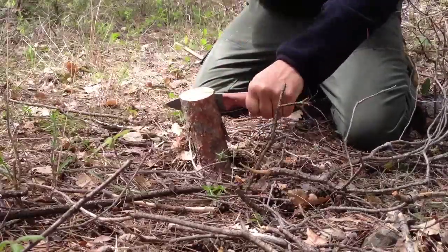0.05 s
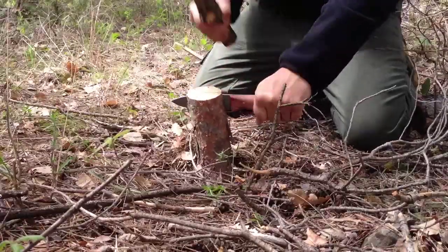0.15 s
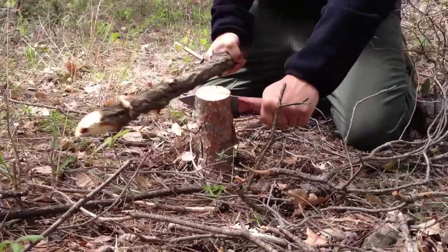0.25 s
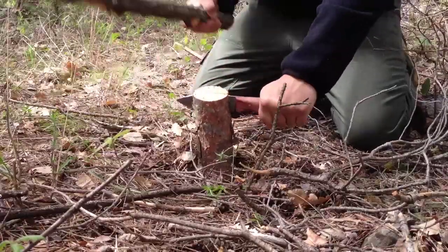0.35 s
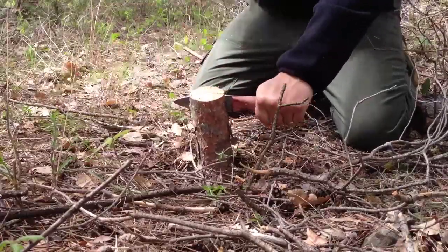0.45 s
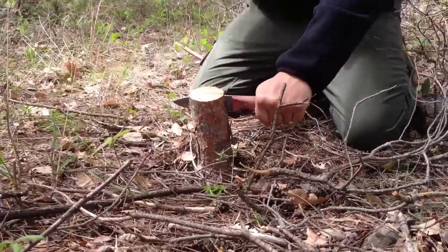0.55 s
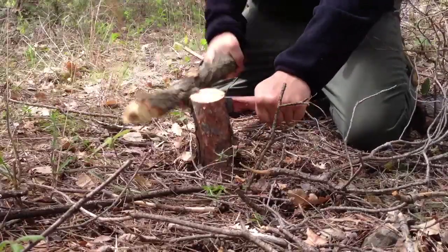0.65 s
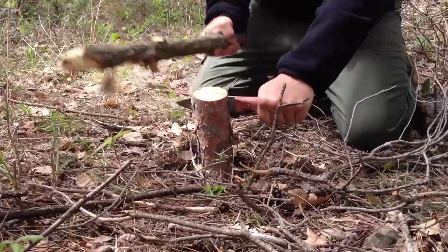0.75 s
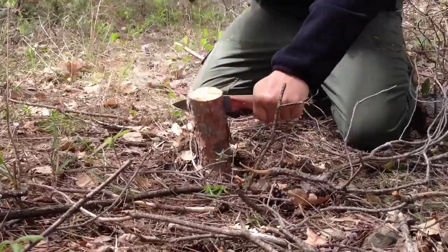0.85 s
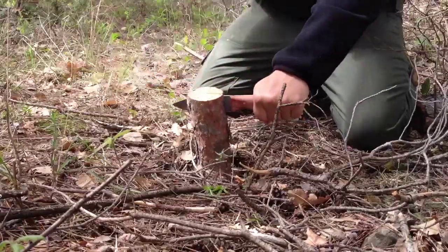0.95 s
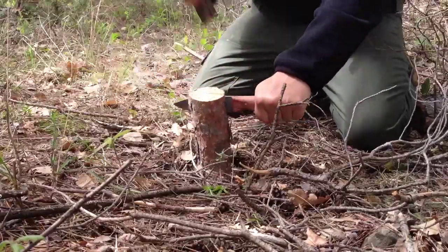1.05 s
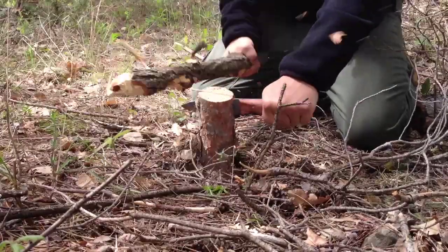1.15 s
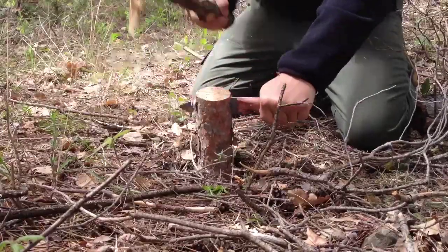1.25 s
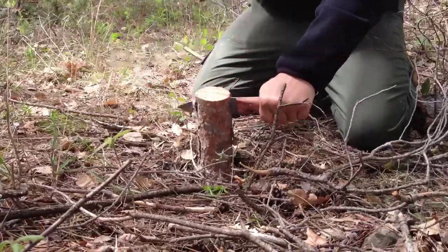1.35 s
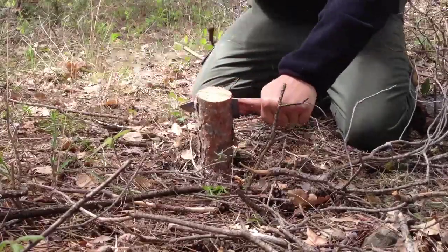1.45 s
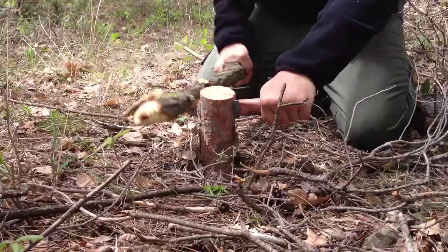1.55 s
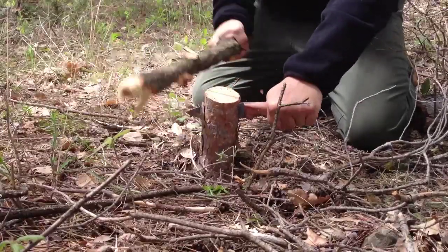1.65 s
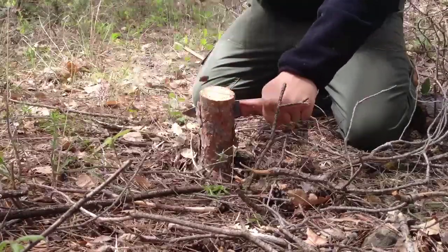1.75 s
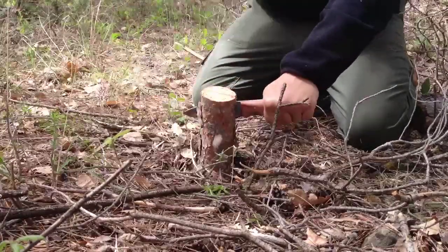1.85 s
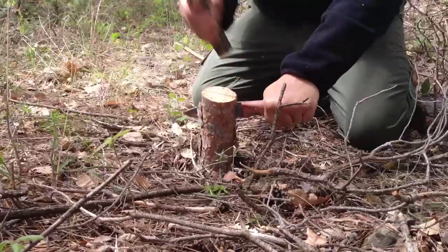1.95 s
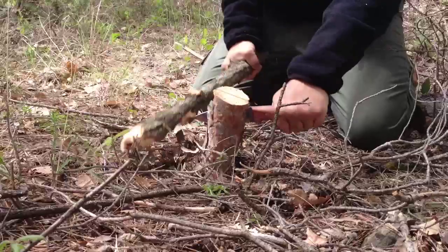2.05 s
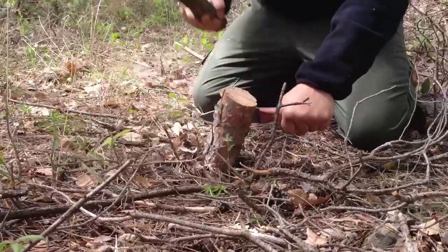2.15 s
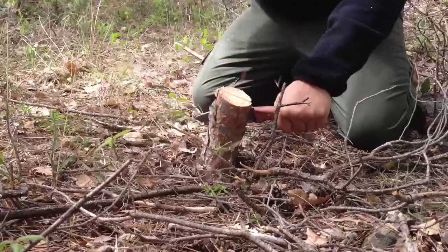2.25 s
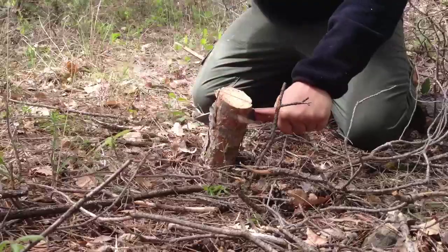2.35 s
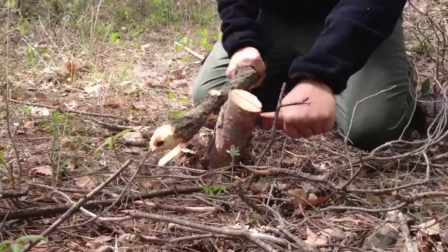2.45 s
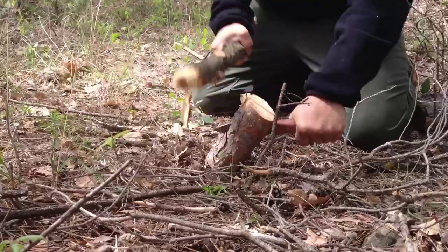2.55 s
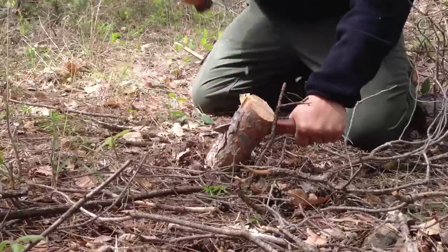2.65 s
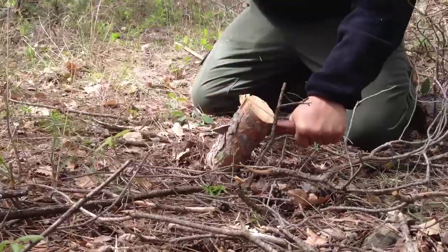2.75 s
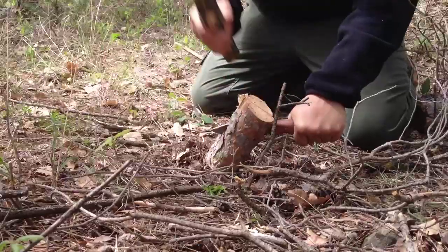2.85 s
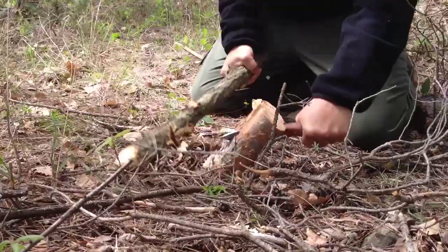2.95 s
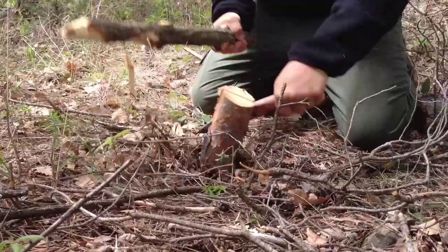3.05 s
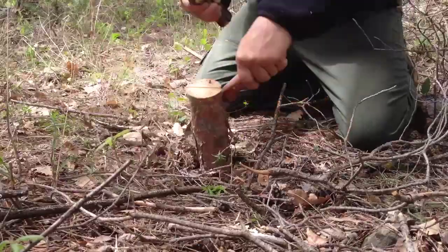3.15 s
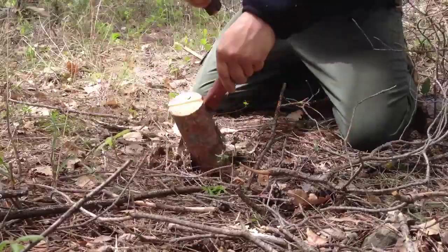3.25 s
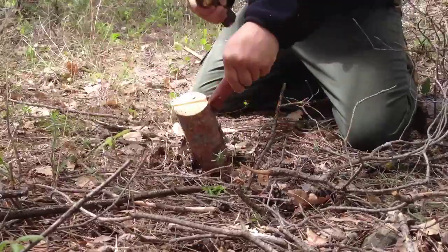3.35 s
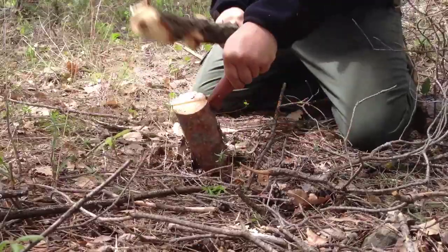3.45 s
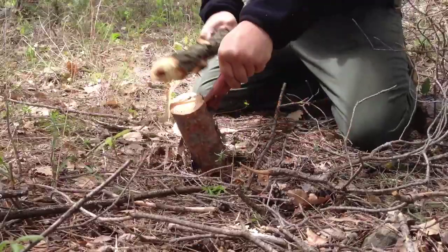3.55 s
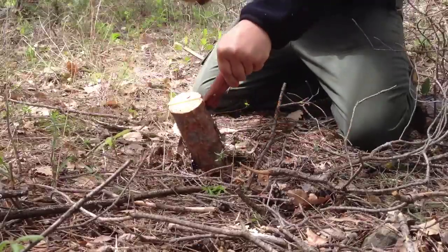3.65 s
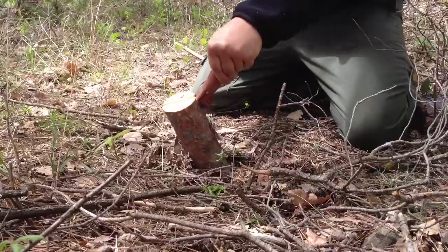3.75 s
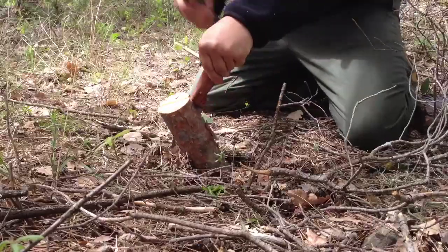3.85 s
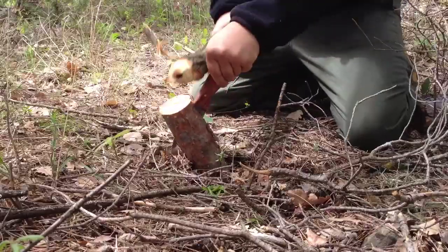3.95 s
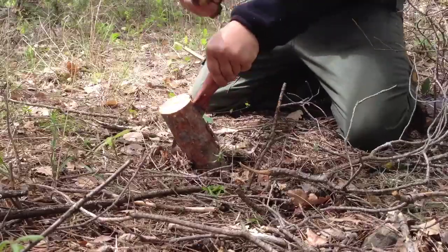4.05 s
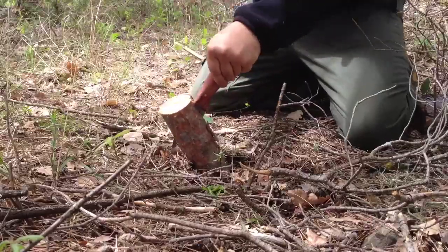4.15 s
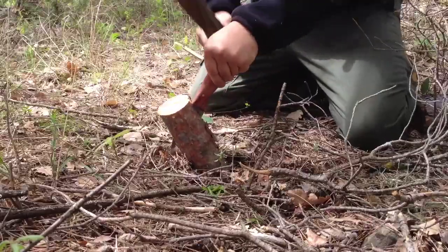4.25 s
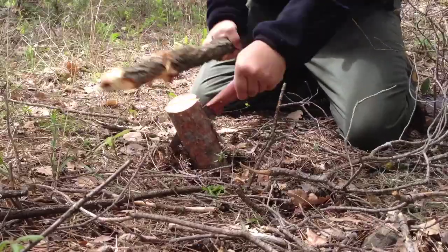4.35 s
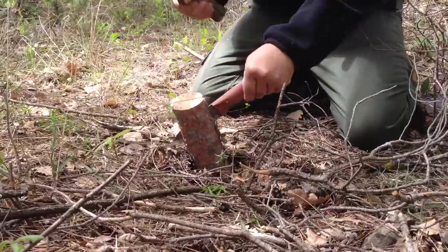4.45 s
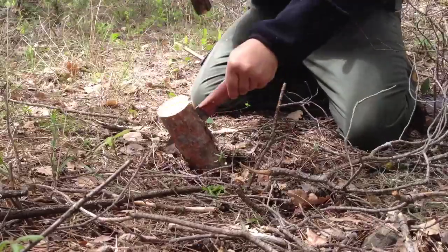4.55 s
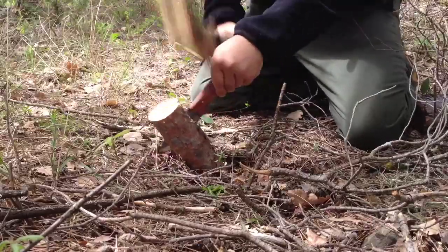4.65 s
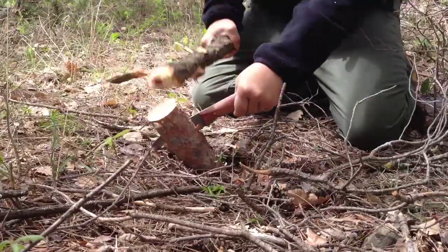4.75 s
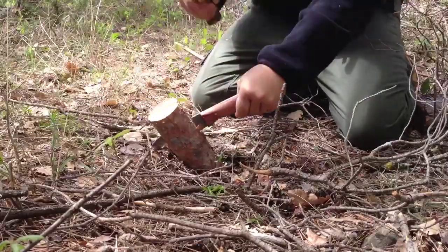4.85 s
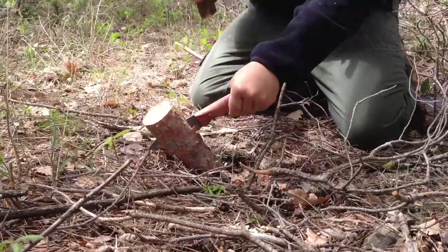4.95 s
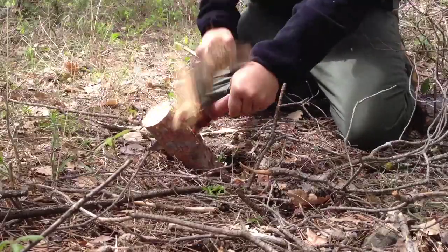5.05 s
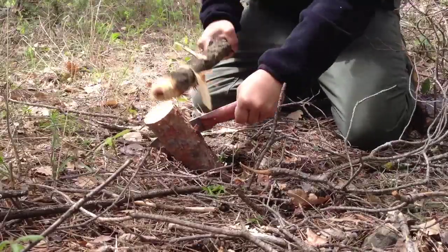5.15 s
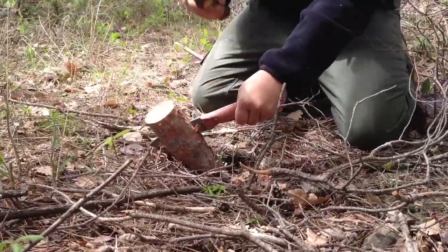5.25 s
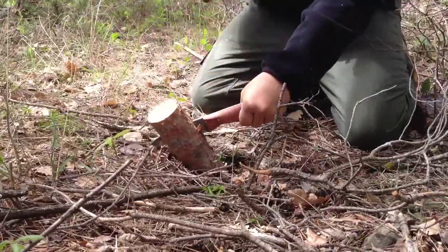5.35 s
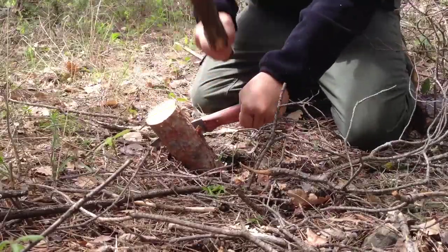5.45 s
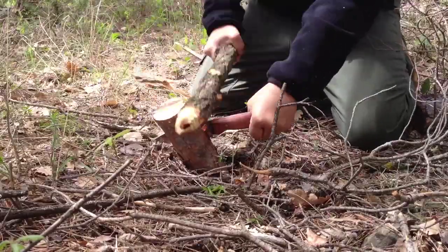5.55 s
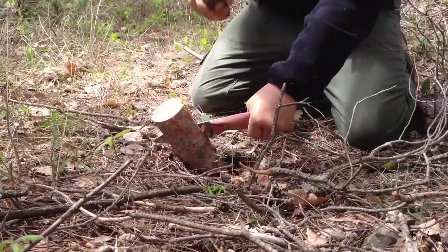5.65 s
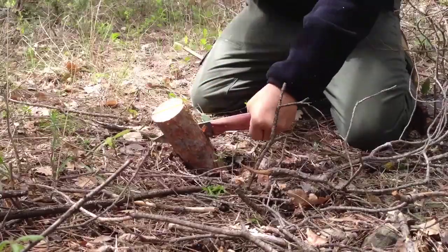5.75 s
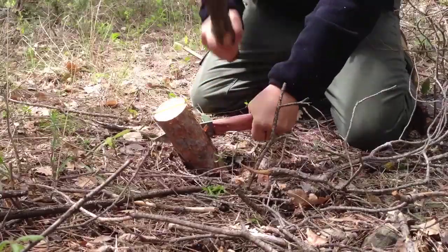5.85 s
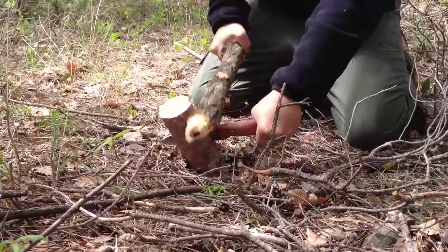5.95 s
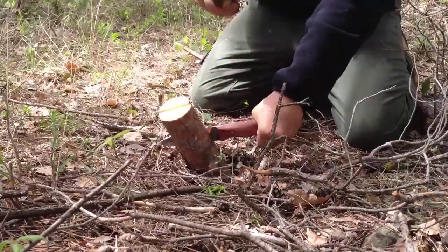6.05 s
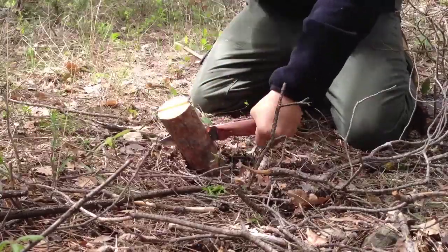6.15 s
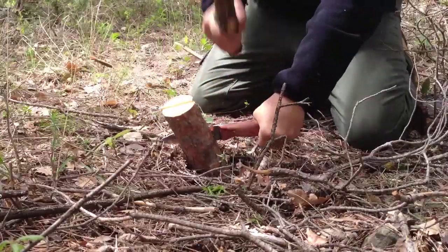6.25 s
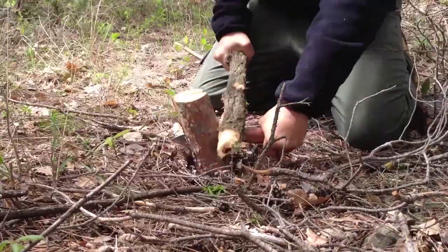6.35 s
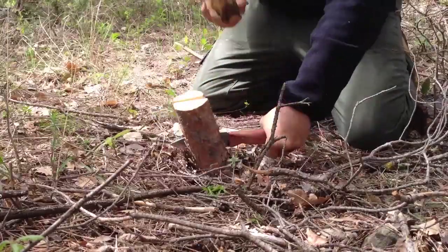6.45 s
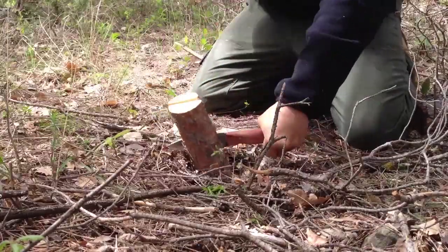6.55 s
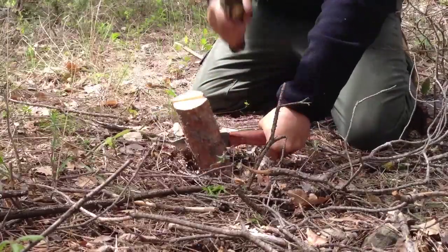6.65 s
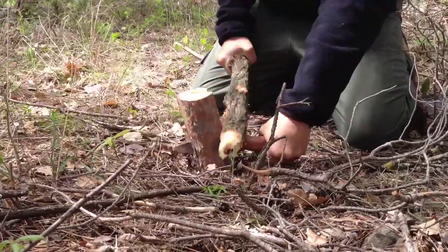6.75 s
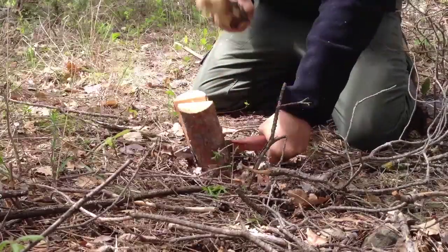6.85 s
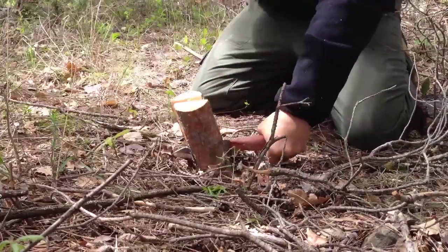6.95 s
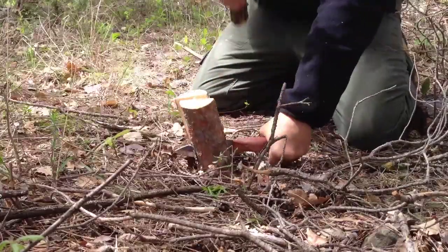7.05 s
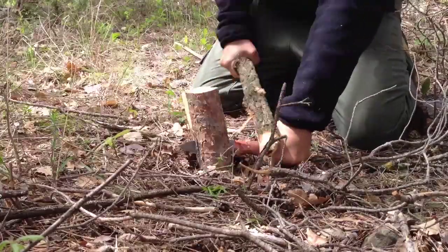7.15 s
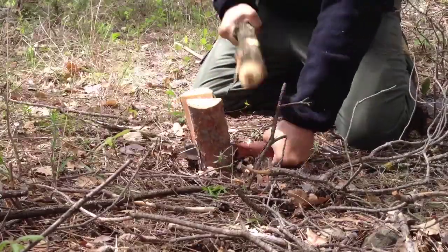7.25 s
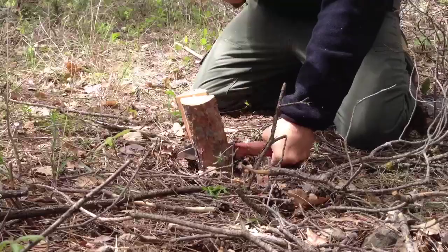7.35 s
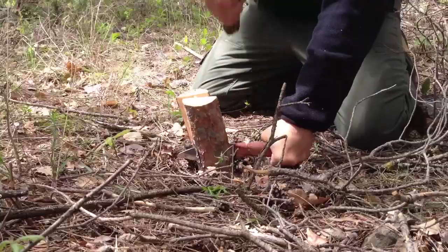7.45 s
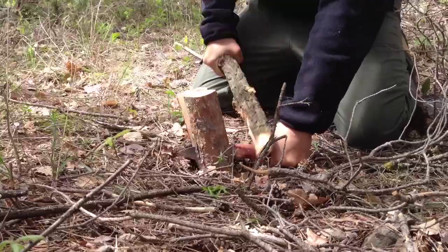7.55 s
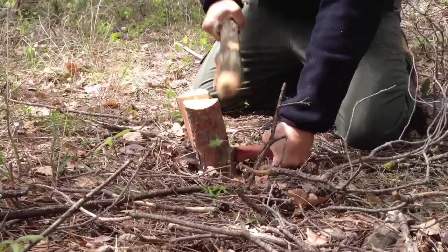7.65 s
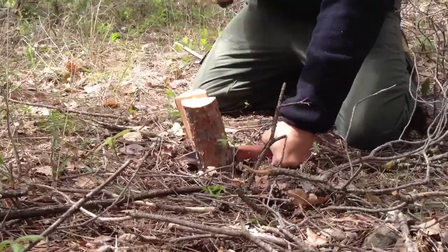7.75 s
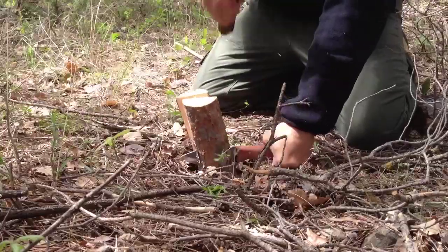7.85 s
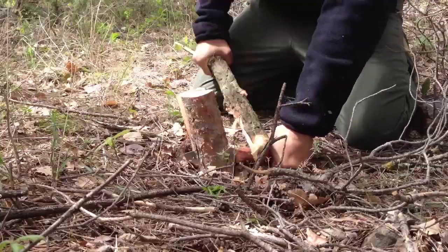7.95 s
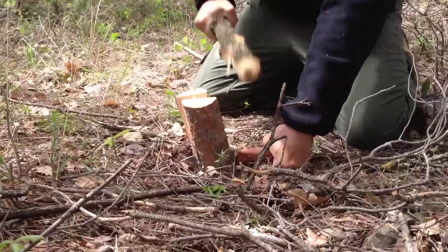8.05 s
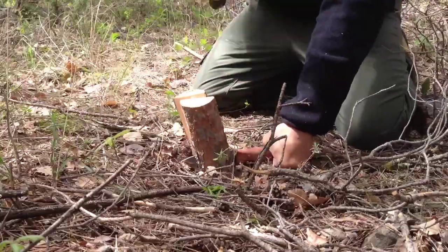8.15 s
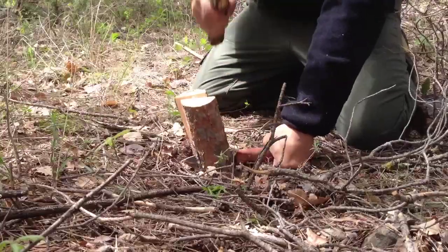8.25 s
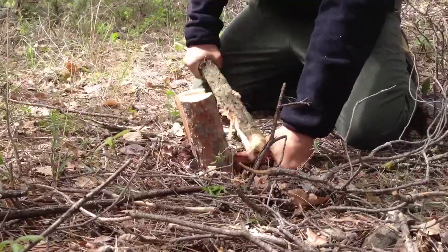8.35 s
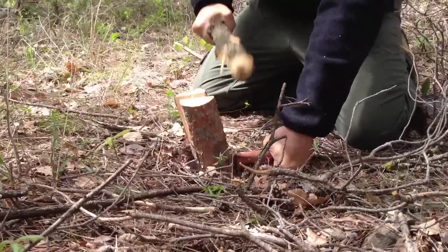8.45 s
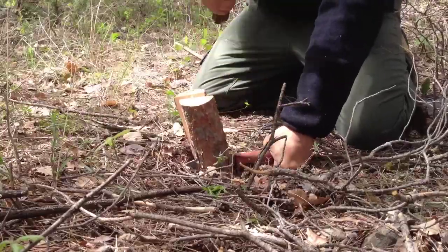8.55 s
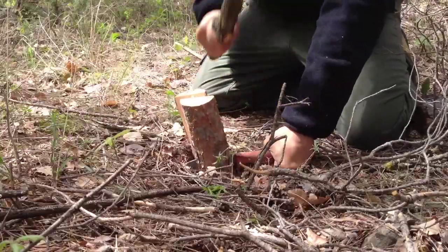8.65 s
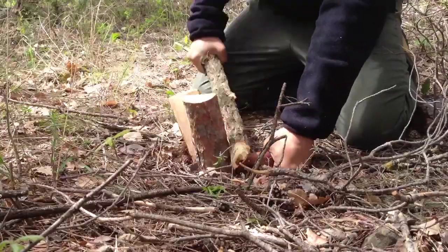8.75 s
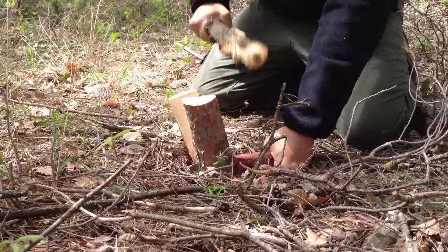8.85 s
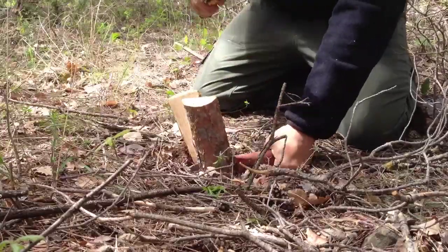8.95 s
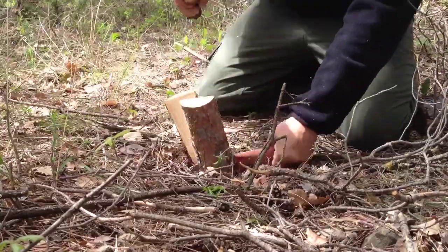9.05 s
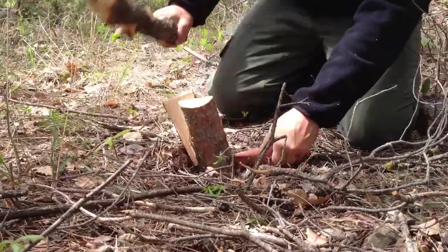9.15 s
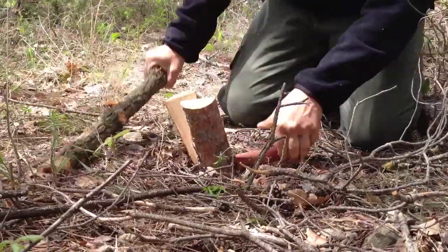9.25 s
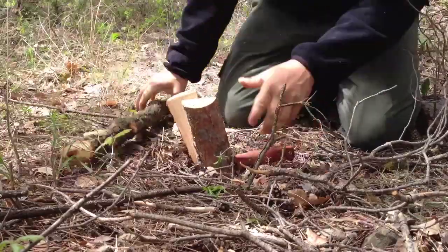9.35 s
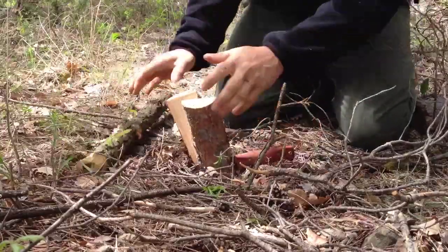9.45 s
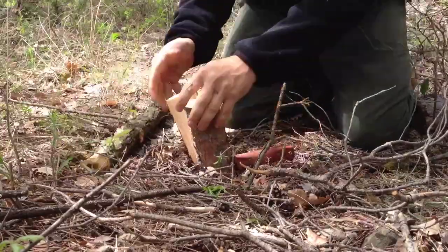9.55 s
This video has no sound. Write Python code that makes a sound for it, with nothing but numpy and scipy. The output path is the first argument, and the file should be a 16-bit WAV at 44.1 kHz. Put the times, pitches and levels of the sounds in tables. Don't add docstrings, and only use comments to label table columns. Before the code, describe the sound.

Sharp wood-on-steel knocks about every four tenths of a second drive a blade through a log, each scattering dry litter outdoors.

```python
import sys
import numpy as np
from scipy import signal
from scipy.io import wavfile

SR = 44100
rng = np.random.default_rng(int(sys.argv[2]) if len(sys.argv) > 2 else 0)


def convert_level_to_amplitude(level_db):
    exponent = np.asarray(level_db, float) / 20
    return 10 ** exponent


def digitize_waveform(pressure):
    field = np.atleast_2d(pressure).T
    bounded = np.clip(field, -1, 1)
    quanta = np.round(bounded * 32767).astype(np.int16)
    wavfile.write(sys.argv[1], SR, quanta)


N = 423351

# (time [s], crack [dB], upper blade tone [Hz], blade song [dB], ground thud [dB])
STICK_BLOWS = [(0.2628, -23, 6100, -15, -29), (0.7138, -14, 7160, -3, -14), (1.1663, 4.5, 5530, -3.5, -20),
               (1.606, -2.5, 5630, -11, -22), (2.0505, -2.5, 6870, -6, -21), (2.4971, -1, 5160, -1, -25),
               (2.9494, -3.5, 5300, -17, -28), (3.547, -19.5, 6540, -25, -48),
               (3.9501, -2.5, 6000, -3.5, -25.5), (4.331, -5, 6770, -11.5, -32),
               (4.719, -8, 6500, -11.5, -34.5), (5.119, -0.5, 5780, -8.5, -31),
               (5.5375, -3.5, 6100, -8.5, -29), (5.9389, -2.5, 6850, -15.5, -29),
               (6.3428, -0.5, 5870, -20, -35.5), (6.7567, -4, 6860, -9, -30.5),
               (7.1774, -0.5, 6990, -15.5, -34.5), (7.577, -1, 7100, -17, -32.5),
               (7.9734, -2.5, 6800, -16.5, -31), (8.366, -3, 7120, -20.5, -31.5),
               (8.7514, 0.5, 6040, -32, -33.5), (9.3056, -32.5, 5770, -46, -52)]
# (log knock [dB], log pitch [Hz], stick tone [dB], stick pitch [Hz], litter spray [dB])
BLOW_RESPONSES = [(-29.5, 360, -33, 1450, -22), (-20.5, 350, -27, 1500, -12.5),
                  (-19.5, 422, -23, 1540, -10.5), (-23.5, 417, -27, 1170, -13.5),
                  (-24.5, 413, -30, 1190, -9), (-25.5, 473, -25.5, 1624, -14.5),
                  (-20, 392, -49, 1600, -16.5), (-32, 348, -45, 1930, -21.5), (-15, 370, -23, 972, -6),
                  (-19.5, 355, -21.5, 1290, -7), (-17, 346, -20.5, 1420, -7), (-22, 442, -24, 1380, -9),
                  (-23, 410, -30.5, 1630, -10.5), (-22, 535, -27, 1700, -13),
                  (-21.5, 584, -22.5, 1080, -11), (-22, 540, -23.5, 1090, -12), (-24, 506, -21, 1090, -12),
                  (-30, 430, -23, 1310, -15.5), (-29, 480, -27, 1490, -10.5), (-31, 510, -29, 1260, -13),
                  (-26.5, 500, -32, 1340, -13), (-53, 450, -60, 1640, -22.5)]


def rms_one(x):
    return x / np.sqrt(np.mean(x ** 2) + 1e-20)


def band(x, low_hz, high_hz):
    return signal.sosfilt(signal.butter(2, [low_hz, high_hz], "band", fs=SR, output="sos"), x)


def high_pass(x, hz):
    return signal.sosfilt(signal.butter(2, hz, "high", fs=SR, output="sos"), x)


def resonance(x, hz, width_hz):
    r = np.exp(-np.pi * width_hz / SR)
    feedback = [1, -2 * r * np.cos(2 * np.pi * hz / SR), r * r]
    return signal.lfilter([(1 - r * r) / 2, 0, (r * r - 1) / 2], feedback, x)


def ring(hz, t60_s, rise_s, size=4000):
    t = np.arange(size) / SR
    return np.sin(2 * np.pi * hz * t) * convert_level_to_amplitude(-60 * t / t60_s) * (1 - np.exp(-t / rise_s))


def add(out, sound, time_s):
    i = max(round(time_s * SR), 0)
    out[i:i + len(sound)] += sound[:N - i]


def drift(rate_hz):
    r = np.exp(-80 * np.pi * rate_hz / SR)
    white = rng.standard_normal(N // 40 + 2002)
    slow = signal.lfilter([1], [1, -2 * r, r * r], white)[2000:]
    return np.interp(np.arange(N) / 40, np.arange(len(slow)), rms_one(slow))


def coloured(white, spectrum, patchy_db):
    edges = 40 * 2 ** (np.arange(27) / 3)
    centres = np.sqrt(edges[1:] * edges[:-1])
    hz, db = np.transpose(spectrum)
    gains = convert_level_to_amplitude(np.interp(np.log(centres), np.log(hz), db))
    bands = []
    for k, gain in enumerate(gains):
        flicker = convert_level_to_amplitude(patchy_db * drift(1.65))
        bands.append(gain * flicker * band(white[k % 2], edges[k], edges[k + 1]))
    return centres, np.array(bands)


def cracks():
    # (frequency [Hz], width [Hz], level [dB])
    crack_modes = [(2980, 600, -24), (3630, 800, -3), (4740, 750, -16.5), (5960, 1190, 2),
                   (6850, 820, -29.5), (10400, 1100, -14), (12900, 2000, -16.5)]
    # (time [s], peak [dB], ring [Hz], fall
    # [ms])
    rebounds = [(0.2726, -15.5, 6260, 0.65), (0.715, -1.5, 3000, 1.52), (0.7177, -1, 4650, 1.4),
                (1.1648, -10.5, 6500, 0.57), (1.176, -20, 6650, 1.3), (1.1805, -34, 6000, 0.7),
                (1.609, -7.5, 5140, 0.82), (2.0597, -5.5, 4960, 1.2), (2.5022, -18.5, 5150, 1.8),
                (2.954, -10, 5100, 1.2), (2.9586, -17.5, 6600, 1.4), (3.956, -12.5, 4400, 1.4),
                (3.963, -10.5, 4900, 0.92), (4.3434, -3, 5100, 1.05), (4.7285, -22, 1720, 8.1),
                (4.7381, -10.5, 5710, 0.84), (5.1331, -13.5, 5500, 1.7), (5.5467, -15, 5960, 0.98),
                (5.5526, -10.5, 6050, 0.39), (5.9434, -21, 6780, 0.84), (6.3468, -10, 5970, 0.9),
                (6.761, -11, 6000, 0.79), (6.772, -28, 4800, 0.8), (7.1825, -11, 6750, 0.74),
                (7.193, -36, 4500, 0.87), (7.5812, -9, 5100, 1.4), (7.9838, -18.5, 7000, 0.92),
                (8.3699, -18, 6600, 1.1), (8.3768, -30, 5300, 1.3), (8.755, -12, 4300, 1.26)]
    # (time [s], peak [dB], ring [Hz], fall [ms])
    snaps = [(1.0504, -30.5, 1610, 2.4), (1.2561, -13.5, 5400, 0.7), (1.4165, -42, 3200, 1.1),
             (1.676, -25, 4660, 0.85), (2.1463, -33, 6270, 1.7), (2.1605, -29, 5900, 1.5),
             (2.1862, -32, 6560, 0.88), (2.274, -25.5, 1740, 0.81), (3.8972, -37, 1680, 0.75),
             (7.338, -25, 2330, 1), (7.3706, -39, 6030, 0.7), (7.6415, -41, 2410, 2.6),
             (7.6832, -27, 5800, 2.7), (8.4644, -34.5, 7500, 2.6), (9.312, -32, 5870, 3.7),
             (9.3523, -37, 6440, 1.2), (9.429, -39.5, 6000, 29), (2.1375, -41, 5800, 0.8),
             (2.168, -34, 5600, 0.9), (2.173, -36, 6600, 0.9)]
    touches = []
    for (s, peak_db, hz, *_), (knock_db, *_) in zip(STICK_BLOWS, BLOW_RESPONSES):
        woody_db = knock_db + 8 - peak_db
        if 3.3 < s < 5.3:
            woody_db += 3.5
        touches.append((s, peak_db, hz, 0.7, woody_db))
    touches += [(*row, -9.5) for row in rebounds]
    touches += [(*row, -16) for row in snaps]

    out = np.zeros(N)
    ms = np.arange(3000) / SR * 1000
    for s, peak_db, hz, fall_ms, woody_db in touches:
        rise_ms = min(0.5 * fall_ms, 2.2)
        shape = (1 - np.exp(-ms / rise_ms)) ** 2 * np.exp(-ms / fall_ms)
        chatter = convert_level_to_amplitude(-11) * np.exp(-ms / 7)
        force = rng.standard_normal(3000) * (shape / shape.max() + chatter)
        force[shape.argmax()] -= 2.5
        modes = [*crack_modes, (hz, 550, -1.5)]
        bright = sum(convert_level_to_amplitude(db) * rms_one(resonance(force, f, width)) for f, width, db in modes)
        woody = rms_one(resonance(force, 1044, 810)) - rms_one(resonance(force, 2200, 550))
        sound = bright / np.abs(bright).max() + convert_level_to_amplitude(woody_db + 1.0) * woody / np.abs(woody).max()
        add(out, convert_level_to_amplitude(peak_db - 2.0) * sound, s + 0.0002)
    return high_pass(out, 800)


def wood_and_blade():
    # (log overtone over knock [dB], blade-side tone [Hz], upper over lower blade tone [dB])
    spots = [(2.5, 2330, -14), (0.5, 2200, -10), (5, 3070, -10.5), (5.5, 3350, -13), (6, 3000, -5.5),
             (8, 3820, -10), (1, 2800, 3), (2.5, 2100, -2), (1, 2020, -7), (0.5, 2830, -5), (1, 2680, -2),
             (2.5, 3170, -10), (1, 3140, 3), (-8, 2270, 5.5), (-15, 2890, 0), (-8, 3090, -4.5),
             (-6, 2310, 0.5), (5.5, 2890, 8), (1.5, 2700, 4.5), (-11, 2840, 9.5), (-33, 3060, -4),
             (2, 2200, -6)]
    out = np.zeros(N)
    for blow, response, spot in zip(STICK_BLOWS, BLOW_RESPONSES, spots):
        s, _, high_hz, song_db, thud_db = blow
        knock_db, log_hz, stick_db, stick_hz, _ = response
        overtone_db, side_hz, high_db = spot

        knock = ring(log_hz, 0.017, 0.00057)
        overtone = convert_level_to_amplitude(overtone_db - 7) * ring(1.854 * log_hz, 0.018, 0.00022)
        log = convert_level_to_amplitude(knock_db + 11.0) * (knock - overtone)
        side = convert_level_to_amplitude(4) * ring(side_hz, 0.0084, 0.00017)
        stick = convert_level_to_amplitude(stick_db + 8.5) * (ring(stick_hz, 0.02, 0.00069) - side)
        body = convert_level_to_amplitude(thud_db + 7.5) * ring(245, 0.041, 0.0049)
        add(out, body - (log + stick), s + 0.00044)

        low_hz = 4776 if s < 5.75 else 4630
        sing_t60_s = 0.0053
        high = convert_level_to_amplitude(high_db + 12.5) * ring(high_hz, sing_t60_s, 0.00033)
        add(out, convert_level_to_amplitude(song_db) * (ring(low_hz, sing_t60_s, 0.00028) - high), s + 0.0008)
    return high_pass(out, 170)


def ground():
    crest_s, lag_s = 0.011, 0.01092
    extra_hz, glide_s, rise_s = 280, 0.0046, 0.0074
    t = np.arange(4000) / SR
    from_crest = t - crest_s
    glide = extra_hz * glide_s * (np.exp(-crest_s / glide_s) - np.exp(-t / glide_s))
    fall = convert_level_to_amplitude(-1.81 * from_crest * 1000)
    swell = (1 - np.exp(-t / rise_s)) ** 4 * fall
    wave = np.cos(2 * np.pi * (144.6 * from_crest + glide))
    wave = wave + convert_level_to_amplitude(-14.0) * np.cos(2 * np.pi * 106 * from_crest)
    out = np.zeros(N)
    for s, *_, thud_db in STICK_BLOWS:
        add(out, convert_level_to_amplitude(thud_db + 10.0) * swell * wave, s + lag_s - crest_s + 0.0013)
    return out


def litter():
    # (time [s], level [dB])
    tears = [
        (0.716, -21.5),
        (2.052, -21),
        (2.95, -19.5),
        (4.333, -23),
        (5.54, -32),
        (7.578, -28),
        (8.753, -27),
    ]
    # (frequency [Hz], level [dB per Hz])
    spray_colour = [(350, -20), (600, -12), (2990, -6), (3480, -6), (4650, -7), (5120, -1.5), (6750, -3),
                    (12200, -15), (15500, -12), (16400, -65)]
    sprays = [(s, spray_db, 0.17) for (s, *_), (*_, spray_db) in zip(STICK_BLOWS, BLOW_RESPONSES)]
    sprays += [(s, db, 0.31) for s, db in tears]
    dull, bright = np.zeros(N), np.zeros(N)
    t = np.arange(SR // 2) / SR
    for s, spray_db, t60_s in sprays:
        spray = convert_level_to_amplitude(spray_db - 21.0 - 60 * t / t60_s) * (1 - np.exp(-t / 0.00021))
        add(dull, spray, s + 0.00034)
        add(bright, convert_level_to_amplitude(-2) * spray, s + 0.0013)

    clumps_db = 2.2 * drift(200)
    grains_db = 3.8 * np.minimum(rng.exponential(1, N), 5)
    grains = rng.standard_normal((2, N)) * convert_level_to_amplitude(grains_db + clumps_db)
    centres, bands = coloured(grains, spray_colour, patchy_db=1.2)
    high = centres > 5300
    mix = dull * bands[~high].sum(axis=0) + bright * bands[high].sum(axis=0)
    return mix / np.std(bands.sum(axis=0))


def chips():
    # (time [s], low tone [dB], low tone [Hz], high tone [dB], high tone [Hz])
    chip_landings = [
        (1.053, -37, 1640, -52, 2550),
        (1.2566, -23.5, 1260, -38, 2710),
        (1.6747, -38, 1610, -50, 3000),
        (2.1606, -52.5, 1530, -61, 2280),
        (2.2732, -31, 1615, -57, 2360),
        (3.8968, -39, 1700, -56, 2860),
        (7.3388, -38, 1430, -45.5, 2340),
        (7.6404, -58, 1900, -62, 2440),
    ]
    out = np.zeros(N)
    t60_s = 0.016
    for s, low_db, low_hz, high_db, high_hz in chip_landings:
        low = convert_level_to_amplitude(low_db + 1.5) * ring(low_hz, t60_s, 0.00034)
        high = convert_level_to_amplitude(high_db + 17.5) * ring(high_hz, t60_s, 0.000079)
        add(out, low - high, s + 0.00092)
    return out


def air():
    # (time [s], leaf hiss [dB])
    breeze = [(0.0, -53), (0.5, -51.5), (1.1, -49), (1.8, -53), (2.3, -51.5), (2.8, -53), (3.2, -50.5),
              (3.85, -49.5), (4.4, -52), (5.0, -51.5), (5.8, -52.5), (6.5, -56.5), (7.0, -54.5), (8.0, -55),
              (8.6, -56.5), (9.05, -55), (9.6, -51)]
    # (frequency [Hz], level [dB per Hz])
    air_colour = [(24, -67), (40, -45.5), (70, -12.5), (112, -16), (190, 0.5), (395, -1), (687, -13),
                  (1170, -9.5), (2670, -10), (4650, -12.5), (6620, -11), (9650, -27.5), (13400, -15),
                  (15200, -32.5), (16400, -60)]
    t, duck_db = np.arange(N) / SR, np.zeros(N)
    for s, crack_db, *_ in STICK_BLOWS:
        depth_db = 0.24 * (crack_db + 10)
        dip_db = 6 * (t - s) - depth_db
        duck_db = np.where(t > s, np.minimum(duck_db, dip_db), duck_db)
    level_db = np.interp(t, *np.transpose(breeze)) + duck_db

    centres, bands = coloured(rng.standard_normal((2, N)), air_colour, patchy_db=1.38)
    low = centres < 650
    gusts_db = 1.3 * drift(14)
    wind = convert_level_to_amplitude(level_db - 6 + gusts_db) * rms_one(bands[low].sum(axis=0))
    leaves = convert_level_to_amplitude(level_db - 1.97) * rms_one(bands[~low].sum(axis=0))
    return wind + leaves


def scene():
    mix = cracks() + wood_and_blade() + ground() + litter() + chips() + air()
    return mix[None]


def low_pass(x):
    return signal.sosfilt(signal.butter(12, 16520, fs=SR, output="sos"), x)


def record(dry):
    x = high_pass(dry, 85)
    x = x + 0.68 * resonance(x, 4440, 590)
    x = np.clip(1.25 * np.tanh(x / 1.25), -0.91, 0.91)
    x = signal.sosfilt(signal.ellip(6, 0.3, 21, 15150, fs=SR, output="sos"), x)
    x = signal.sosfilt(signal.cheby2(10, 50, 16700, fs=SR, output="sos"), x)
    return low_pass(np.clip(x, -1, 1))


dry = scene()
out = record(dry)
digitize_waveform(out)
```